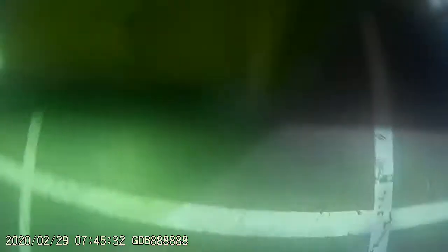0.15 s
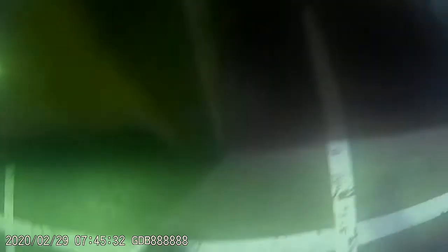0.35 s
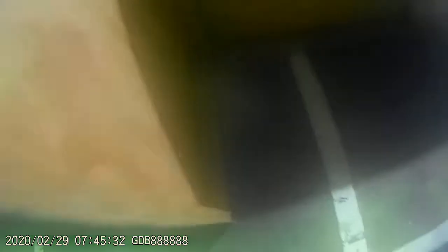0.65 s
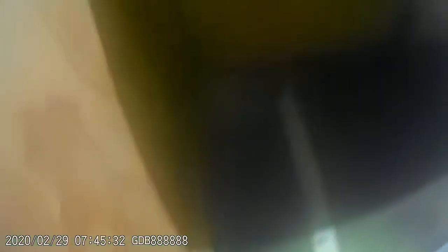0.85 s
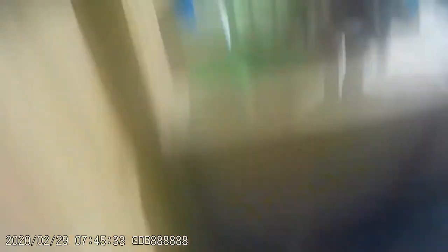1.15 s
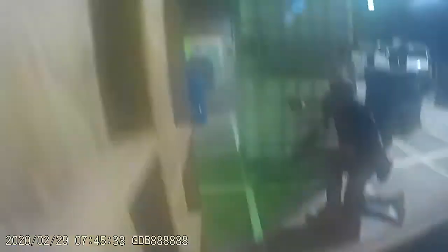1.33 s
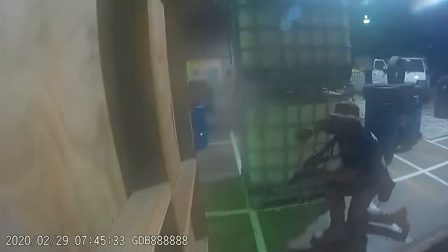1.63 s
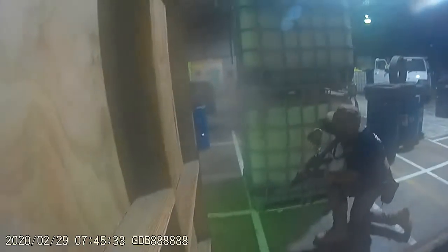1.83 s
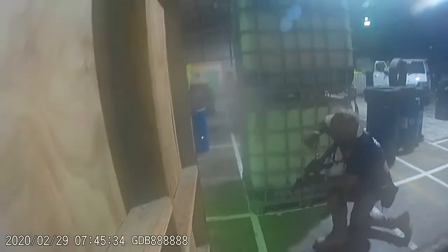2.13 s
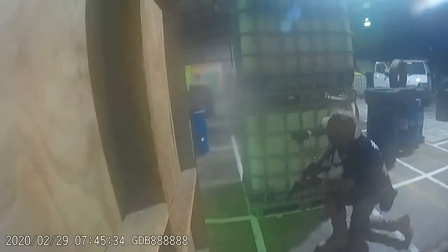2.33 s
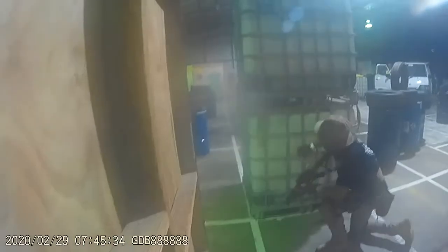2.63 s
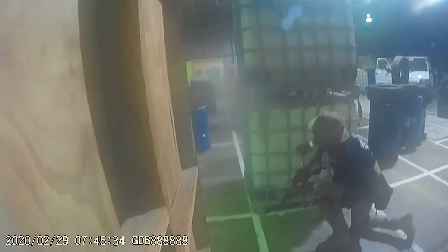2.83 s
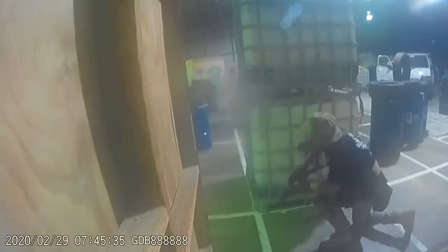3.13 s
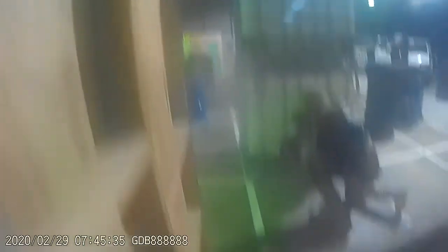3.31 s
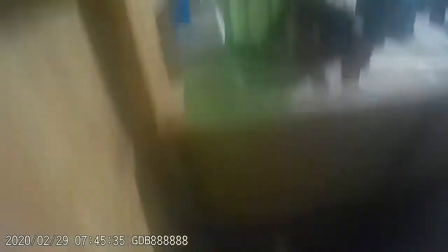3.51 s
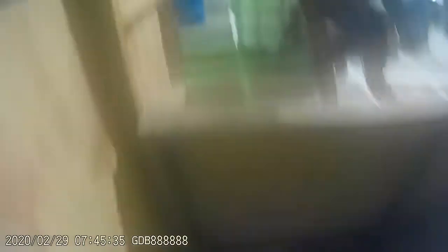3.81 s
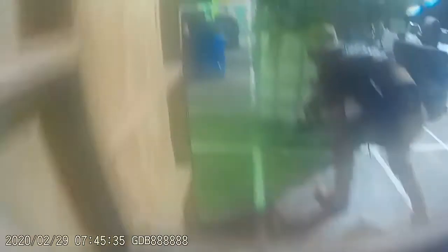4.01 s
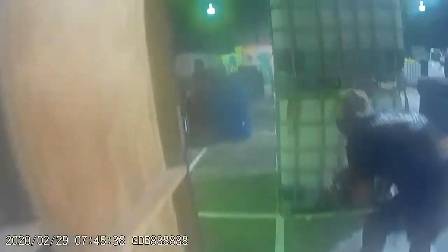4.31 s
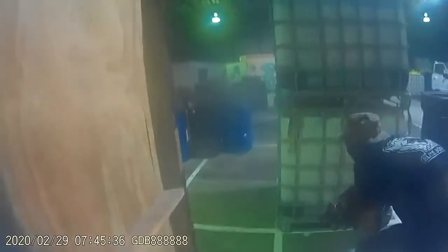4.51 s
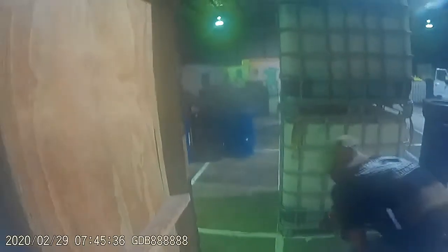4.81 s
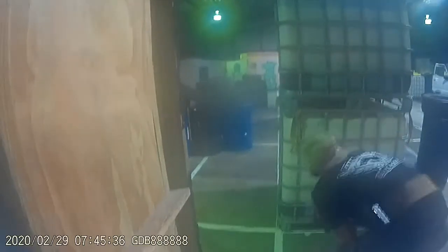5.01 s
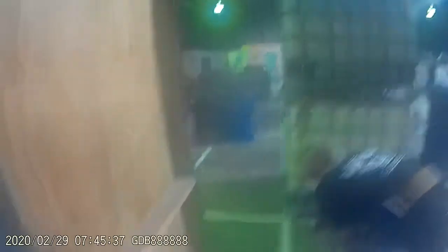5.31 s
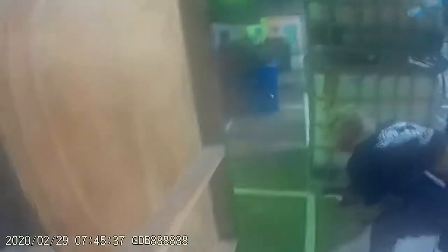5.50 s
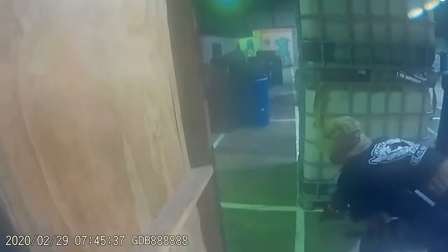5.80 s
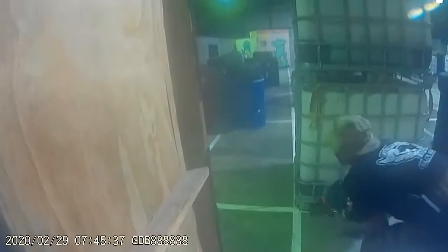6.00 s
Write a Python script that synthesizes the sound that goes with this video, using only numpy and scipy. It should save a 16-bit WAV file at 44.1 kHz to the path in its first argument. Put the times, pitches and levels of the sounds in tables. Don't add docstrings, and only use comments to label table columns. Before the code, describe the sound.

Indoors, a small camera microphone fixed to a toy blaster picks up faint hiss, soft fabric movement, dull knocks and a barely audible strap creak. A sudden fast plastic clatter follows, hollow thuds and loose parts buzzing over gear grind, with a brief hitch before resuming. After about a second of rustling and small taps, another long burst hammers on, boxy, dry and clipped, until the cut.

```python
import sys
import numpy as np
from scipy import signal
from scipy.io import wavfile
from scipy.ndimage import uniform_filter1d

SR = 44100
rng = np.random.default_rng(int(sys.argv[2]) if len(sys.argv) > 2 else 0)


def convert_level_to_amplitude(level_db):
    exponent = np.asarray(level_db, float) / 20
    return 10 ** exponent


def log_audio(samples):
    frames = np.atleast_2d(samples).T
    limited = np.clip(frames, -1, 1)
    pcm = np.round(limited * 32767).astype(np.int16)
    wavfile.write(sys.argv[1], SR, pcm)


N = 271194


def evened(x):
    return x / np.sqrt(np.mean(x ** 2) + 1e-20)


def add(mix, s, sound):
    part = mix[max(round(s * SR), 0):][:len(sound)]
    part += sound[:len(part)]


def band(x, lo_hz, hi_hz):
    return signal.sosfilt(signal.butter(2, [lo_hz, hi_hz], "band", fs=SR, output="sos"), x)


def track(tables, column, hold_s=0):
    t, out = np.arange(N) / SR, np.zeros(N)
    for rows in tables:
        s, db = np.transpose(rows)[[0, column]]
        inside = (t >= s[0]) * (t < s[-1] + hold_s)
        out += convert_level_to_amplitude(np.interp(t, s, db)) * inside
    return uniform_filter1d(out, size=300)


def rings(hz, db, t60, size=8000):
    t = np.arange(size)[:, None] / SR
    return (convert_level_to_amplitude(db - 60 * t / t60) * np.sin(2 * np.pi * hz * t)).sum(1)


def chatter(spread_db):
    size = np.minimum(rng.exponential(1, N), 4)
    return evened(rng.standard_normal(N) * convert_level_to_amplitude(spread_db * size))


def burst(length_ms):
    ms = np.arange(1500) / SR * 1000
    return (1 - np.exp(-ms / 0.7)) / (1 + (ms / length_ms) ** 4)


def blaster():
    # delay after slam/ms, shove/dB, rattle/dB, rattle length/ms
    slam = [
        (0, 0.5, -11.5, 5.26),
        (4.9, -5.5, -16, 3.03),
        (7.2, -6.5, -12.5, 2.38),
    ]
    # delay after slam/ms, shove/dB, rattle/dB, rattle length/ms
    rebounds = [
        (12.12, -8, -19, 3.83),
        (17.27, -12.5, -15, 3.27),
        (22.42, -15.5, -21.5, 4.5),
        (38.76, -23, -25.5, 5.4),
    ]
    # t/s, peak level/dB, shove/dB
    clacks = [(1.428, -8.5, -22), (1.433, -31, 5), (1.484, -6, 12), (1.495, -4, -4), (2.225, -11, -16),
              (2.354, -15, -16), (2.368, -7, -35), (3.148, -19, 12), (3.186, -31, 6), (4.286, -4, -21),
              (5.258, -4, -6), (5.304, -17, -36), (5.341, -9, 18), (5.357, -6, -10)]
    shoves, rattle, air, clank = np.zeros((4, N))
    blows = [*slam, *rebounds]
    fired = shots()
    chance = rng.standard_normal((len(fired), len(blows), 3))
    shell = rings(1117.3 * np.array([1, 1.3]), -7 - np.array([0, 9.]), 0.056, size=1500) * burst(5.4)
    for (s, shove_db, rattle_db, bounce_db, rebound_db), luck in zip(fired, chance):
        for k, (ms, blow_db, shake_db, length_ms) in enumerate(blows):
            at = s + ms / 1000
            if k == 0:
                push_db, loose_db = shove_db, 1.37 * rattle_db
            else:
                at += 0.3 * luck[k, 0] / 1000
                if k < len(slam):
                    push_db, loose_db = bounce_db + 1.1 * luck[k, 1:]
                    loose_db += 1.37 * rattle_db
                else:
                    push_db, loose_db = rebound_db + 2.2 * luck[k, 1:]
            add(shoves, at, convert_level_to_amplitude([blow_db + push_db]))
            add(rattle, at + 0.00071, burst(length_ms) * convert_level_to_amplitude(shake_db + loose_db))
        add(clank, s + 0.001076, convert_level_to_amplitude(1.48 * rattle_db) * shell)
        add(rattle, s - .006, convert_level_to_amplitude(-19.5) * np.linspace(0, 1, round(0.0049 * SR)))
        add(air, s - .003, convert_level_to_amplitude(-53) * burst(13.3))
        add(air, s + .005, convert_level_to_amplitude(-75) * burst(22.))
        add(air, s + .013, convert_level_to_amplitude(-56.5 + rebound_db) * burst(3.4))
    for s, db, shove_db in clacks:
        add(shoves, s, convert_level_to_amplitude([db + shove_db - 13.5]))
        add(rattle, s, convert_level_to_amplitude(db - 5.5) * burst(4.4))

    grind, share = motor()
    rumble = share * evened(band(rng.standard_normal(N), 170, 470))
    mesh_hz, mesh_width_hz = 1183, 156
    whirr = convert_level_to_amplitude(1) * evened(band(chatter(1.6), mesh_hz - mesh_width_hz / 2, mesh_hz + mesh_width_hz / 2))
    nozzle = air * evened(band(chatter(3.5), 7750, 8340))
    ticks = convert_level_to_amplitude(13) * band(shoves, 2330, 15000)
    loose_parts = housing(rattle * chatter(2.54) + convert_level_to_amplitude(-5) * grind * chatter(3.1) + ticks)
    return body(shoves) + clank + band(loose_parts, 260, 22000) + grind * (rumble + whirr) + nozzle


def shots():
    # first slam t/s, last slam t/s
    runs = [
        (1.5826, 2.1423),
        (2.4719, 2.9817),
        (4.4564, 5.1723),
        (5.4954, 6.109),
    ]
    # shove/dB, rattle/dB, bounce/dB, rebound/dB
    steady_db = (0.27, 1.22, 1.4, 0.57)
    # shove/dB, rattle/dB, bounce/dB, rebound/dB
    scatter_db = (1.0, 0.6, 2.0, 2.5)
    # t/s, shove/dB, rattle/dB, bounce/dB, rebound/dB
    uneven = [(1.4569, -1.5, 12, -19, 3), (1.5265, 7.5, 5.5, -13, 8), (2.1958, 1.5, 1.5, -1, -3),
              (2.2754, 0, 4.5, -4, -41), (2.3778, 1.5, 3.5, -27, -4), (2.4147, 2, 6.5, -6, 8),
              (3.0346, 2.5, 0.7, -1, 4), (3.1055, 2.5, 5, -9, -11), (4.2515, -21, 7.5, -35, -6),
              (4.294, 2, 9.5, -13, 8), (4.3515, 2.5, 1.5, -7, 5), (4.4055, 4, 0.5, -1.5, -3),
              (5.225, 0, -1, -10, -0.5), (5.3165, 3, 5, -6, -20), (5.3868, 7, 3.5, -2, 5),
              (5.442, 2, 2.5, -4, 2.5)]
    cycle_s, jitter_s = .0511, .0004
    s = np.concatenate([np.linspace(a, b, round((b - a) / cycle_s) + 1) for a, b in runs])
    luck = np.clip(rng.standard_normal((len(s), 5)), -2, 2)
    levels = np.array(steady_db) + np.array(scatter_db) * luck[:, 1:]
    steady = np.column_stack([s + jitter_s * luck[:, 0], levels])
    return np.vstack([uneven, steady])


def motor():
    # pull t/s, release t/s, start-up grind/dB, start-up rumble/dB, coasting loss/(dB/s)
    pulls = [
        (1.424, 2.205, 3.5, 0.5, 90),
        (2.344, 3.07, 5, -0.5, 154),
        (4.227, 5.244, 5, -5.5, 130),
        (5.302, 6.2, -1.5, 2, 100),
    ]
    spin_up_s, wind_up_s, coast_s = 0.15, 0.013, 0.14
    t, grind, share = np.arange(N) / SR, np.zeros(N), np.zeros(N)
    stops = np.append(np.transpose(pulls)[0, 1:], N / SR)
    for (pull, release, surge_db, rumble_db, loss_db), stop in zip(pulls, stops):
        on = (t >= pull) * (t < min(release + coast_s, stop))
        fresh = np.exp(-(np.maximum(t - pull, 0) / spin_up_s) ** 2)
        rise = np.clip((t - pull) / wind_up_s, .2, 1)
        coasting_db = loss_db * np.maximum(t - release, 0)
        grind += on * rise * convert_level_to_amplitude(-26 + surge_db * fresh - coasting_db)
        share += on * convert_level_to_amplitude(-1 + rumble_db * fresh)
    return uniform_filter1d(grind, size=300), share


def body(shoves):
    # f/Hz, level/dB, time to fade by 60 dB/s
    hollow_modes = [(152.4, -14, 0.053), (218.4, -10.5, 0.03), (285.4, -11.5, 0.037), (402.6, -13.5, 0.032),
                    (490, -15, 0.026), (859, -14, 0.03)]
    hz, db, t60 = np.transpose(hollow_modes)
    t = np.arange(6000)[:, None] / SR
    pull = (convert_level_to_amplitude(db - 60 * t / t60) * np.cos(2 * np.pi * hz * t)).sum(1)
    contact = np.hanning(round(0.00088 * SR))
    hollow = signal.oaconvolve(shoves, np.convolve(pull, contact / contact.sum()))[:N]
    sway = rings(np.array([32., 58.]), np.array([-31., -29.]), 0.26)
    rocking = signal.oaconvolve(shoves, sway)[:N]
    return -band(hollow, 58, 4200) - rocking


def housing(x):
    # f/Hz, width/Hz, level/dB
    resonances = [(746, 677, 2), (1104, 95, 1.5), (1402, 152, 3.5), (1840, 570, -9.5), (2617, 415, -14),
                  (3300, 210, -28.5), (4480, 400, -28.5), (5100, 570, -40.5), (7800, 600, -54.5)]
    hz, width, db = np.transpose(resonances)
    f = abs(np.fft.fftfreq(4096, 1 / SR))[:, None]
    power = (convert_level_to_amplitude(2 * db) / (1 + ((f - hz) / width) ** 2) ** 3).sum(1)
    log_gain = .5 * np.log(power + convert_level_to_amplitude(-130))
    ring = np.fft.ifft(np.exp(signal.hilbert(log_gain).conj())).real[:2048]
    return signal.oaconvolve(x, ring / np.linalg.norm(ring))[:N]


def knocks():
    # t/s, peak level/dB, thud/dB, snap/dB
    taps = [(0.044, -39, -6, -25), (0.086, -37, -16, -25), (0.103, -37, -10, -27), (0.239, -42, -10, -19),
            (0.408, -25, -25, -35), (0.453, -48, 3, -14), (0.563, -37, -6, -23), (0.584, -34.5, -5, -27),
            (0.812, -39, 2, -12), (0.882, -20, -12.5, -11), (0.93, -15.5, -34, -8), (0.944, -22, -11, -24),
            (0.967, -23.5, -33, -2), (0.994, -27, -25, 1), (1.261, -30, -22, -22), (1.275, -25.5, -15, -2),
            (1.279, -26, -34, -24), (3.421, -23.5, -35, 0.5), (3.453, -21.5, -38, -16),
            (3.516, -19.5, -24, -2.5), (3.666, -49, -13, -11), (3.675, -43, -6, -7),
            (3.692, -42.5, 2, -11.5), (3.702, -47, -16, -8), (4.052, -41, -41, -18)]
    out, shoves, snaps, drag = np.zeros((4, N))
    soft = 1 - np.exp(-np.arange(2000) / 60.0)
    for (s, db, thud_db, snap_db), tick in zip(taps, rng.standard_normal((len(taps), 120))):
        hz = 1194 * (1 + 0.036 * tick[-1])
        ring_db = db - np.array([11., 1.5, 8.])
        add(out, s, soft * rings(hz * np.array([.78, 1, 1.27]), ring_db, 0.02, size=2000))
        add(snaps, s, convert_level_to_amplitude(db + snap_db + 6) * tick * np.exp(-np.arange(len(tick)) / 30))
        add(shoves, s, convert_level_to_amplitude([db + thud_db - 3]))
        add(drag, s, convert_level_to_amplitude(db + thud_db - 13.5) * burst(12.0))
    sliding = drag * evened(band(rng.standard_normal(N), 174, 580))
    return out + band(snaps, 1340, 3050) + body(shoves) + sliding


def carrier():
    # f/Hz, level per Hz/dB
    cloth = [(410, -21.5), (700, -13.5), (823, -17), (1060, -4.5), (1200, -3.5), (1530, -2), (1740, -7.5),
             (2040, -14), (2350, -6), (2670, -6), (3560, -19.5), (4130, -24.5), (4690, -16.5),
             (5320, -32.5), (11000, -39.5), (14300, -77.5), (22000, -120)]
    # t/s, rustle level/dB
    busy = [
        [(0.0, -64), (0.172, -67.5), (0.5, -68.5), (0.58, -64), (0.808, -51), (1.012, -50.5), (1.09, -55.5),
         (1.41, -54)],
        [(3.13, -50), (3.184, -51), (3.28, -44), (3.46, -43), (3.66, -47.5), (3.86, -48.5), (4.05, -46.5),
         (4.215, -48.5)],
    ]
    frames, hz = N // 128 + 5, np.fft.rfftfreq(512, 1 / SR)
    a, b, patches = rng.standard_normal((frames, 257, 3)).T
    patches = uniform_filter1d(patches, size=6, axis=0)
    patches = evened(uniform_filter1d(patches, size=12, axis=1))
    f, db = np.transpose(cloth)
    colour = np.interp(np.log(hz + 1), np.log(f), db)[:, None]
    spectrum = (a + 1j * b) * convert_level_to_amplitude(colour + 1.7 * patches)
    rustle = signal.istft(spectrum, nperseg=512, noverlap=384)[1][:N]
    sway = band(band(rng.standard_normal(N), 27, 37.2), 36, 50)
    scuff = band(rng.standard_normal(N), 50, 500)
    moving = track(busy, 1, hold_s=.04) * evened(rustle)
    swaying = lurching(column=2, still_db=-64) * evened(sway)
    return moving + swaying + lurching(column=3, still_db=-68) * evened(scuff)


def lurching(column, still_db):
    # t/s, length/s, sway level/dB, scuff level/dB
    lurches = [(0.028, 0.23, -49.5, -69), (0.304, .06, -58, -73), (0.434, 0.028, -43.5, -61),
               (0.598, 0.23, -44.5, -65.5), (0.935, 0.088, -36.5, -47), (1.133, .06, -55, -69),
               (1.236, 0.036, -67, -62), (3.173, 0.094, -44.5, -52), (3.48, .12, -49, -64),
               (3.69, 0.061, -48, -59), (4.065, 0.16, -65, -71)]
    t = np.arange(N) / SR
    swells = [convert_level_to_amplitude(row[column]) * np.exp(-((t - row[0]) / row[1]) ** 2 * 2) for row in lurches]
    return convert_level_to_amplitude(still_db) + sum(swells)


def creak():
    # t/s, f/Hz, level/dB
    strap = [
        (1.07, 502.9, -75),
        (1.116, 562, -60),
        (1.262, 542, -75),
        (1.282, 630, -75),
        (1.302, 567, -68),
        (1.4, 545, -62),
    ]
    s, hz, db = np.transpose(strap)
    t = np.arange(N) / SR
    turns = np.cumsum(np.interp(t, s, hz)) / SR
    return np.sqrt(2) * track([strap], 2) * np.sin(2 * np.pi * turns)


def electronics():
    # f/Hz, level/dB
    whine = [(6804, -88), (13609, -84)]
    t = np.arange(N) / SR
    tones = sum(np.sqrt(2) * convert_level_to_amplitude(db) * np.sin(2 * np.pi * hz * t) for hz, db in whine)
    opening = ((t - .015) % 1 < 0.066) + .4 * ((t - .12) % 1 < .03)
    leak = convert_level_to_amplitude(-73) * uniform_filter1d(opening, size=200) * np.sin(2 * np.pi * 11122 * t)
    hiss = convert_level_to_amplitude(-75 + 3.5) * rng.standard_normal(N)
    return hiss + tones + leak


def scene():
    return (blaster() + knocks() + carrier() + creak())[None]


def roll_off(x):
    return signal.sosfilt(signal.butter(12, 16410, fs=SR, output="sos"), x)


def record(dry):
    clipped = np.clip(dry, -.7, .7)
    drooped = signal.lfilter(*signal.butter(1, [6, 19000], "band", fs=SR), clipped)
    treble_limit = signal.firwin(511, 16150, fs=SR)[None]
    edged = signal.oaconvolve(drooped + electronics(), treble_limit, "same")
    return roll_off(edged)


dry = scene()
out = record(dry)
log_audio(out)
```